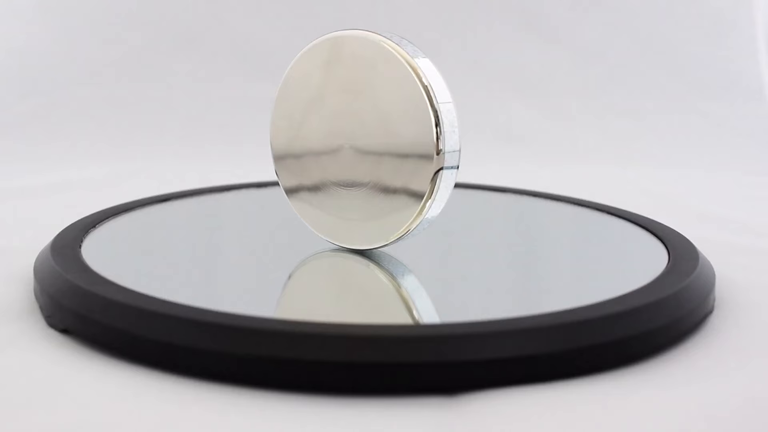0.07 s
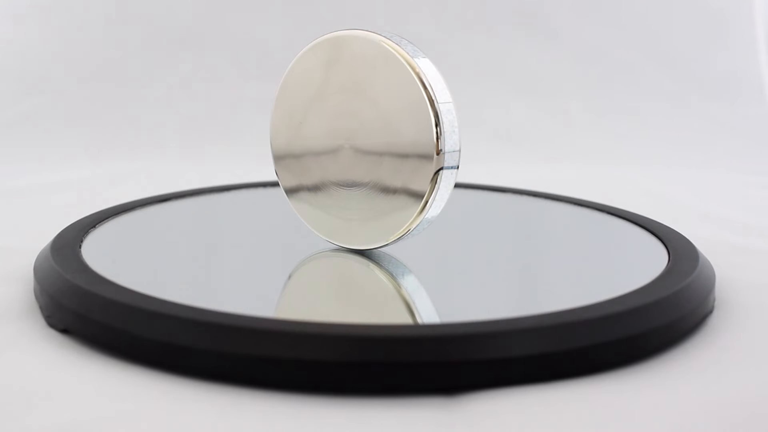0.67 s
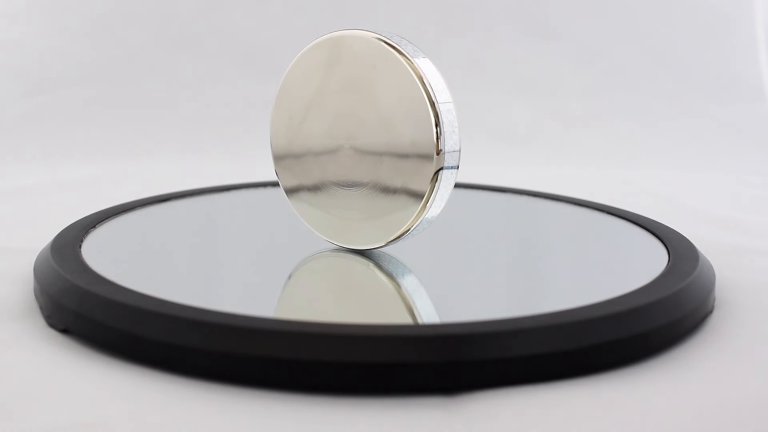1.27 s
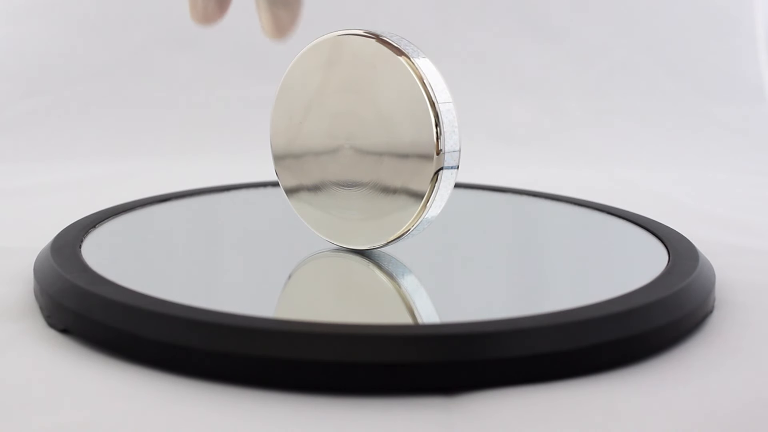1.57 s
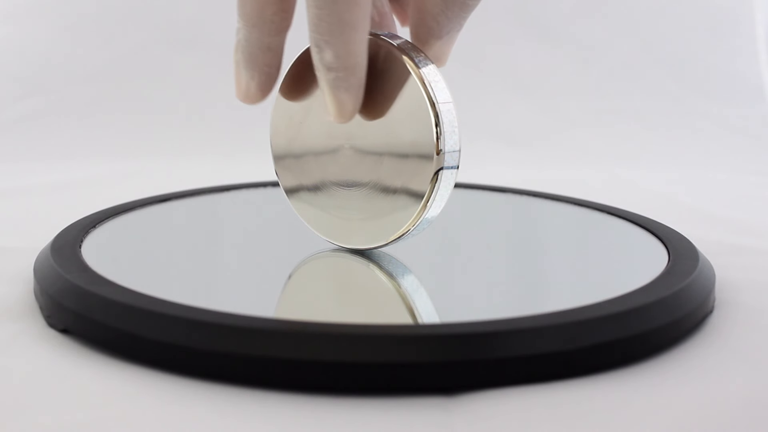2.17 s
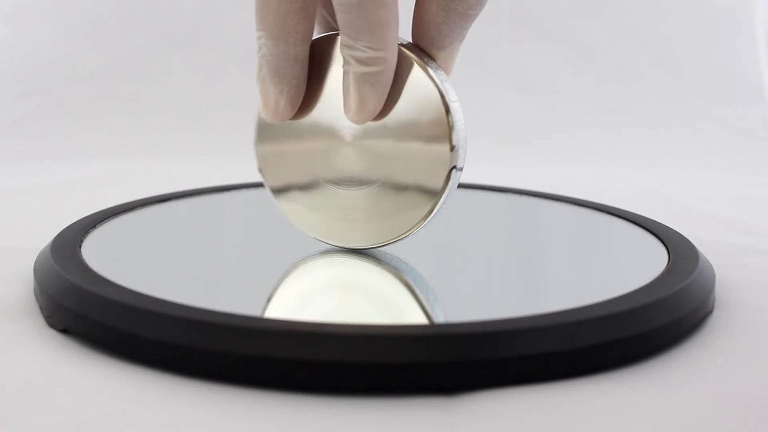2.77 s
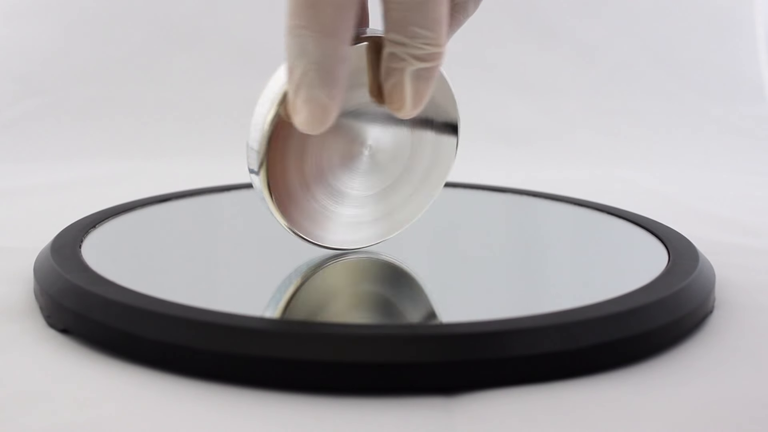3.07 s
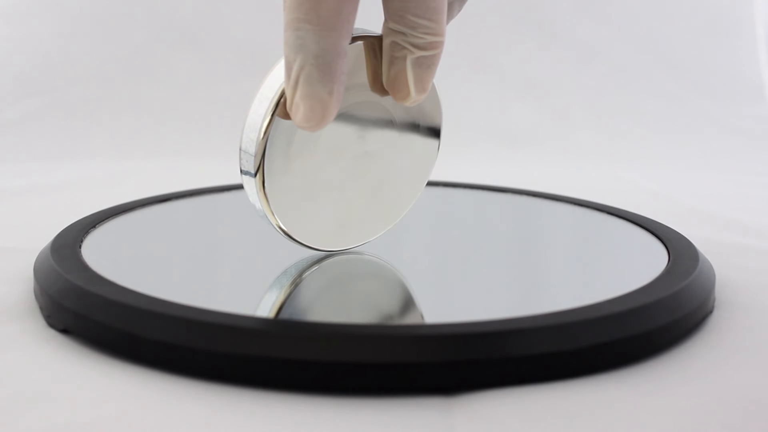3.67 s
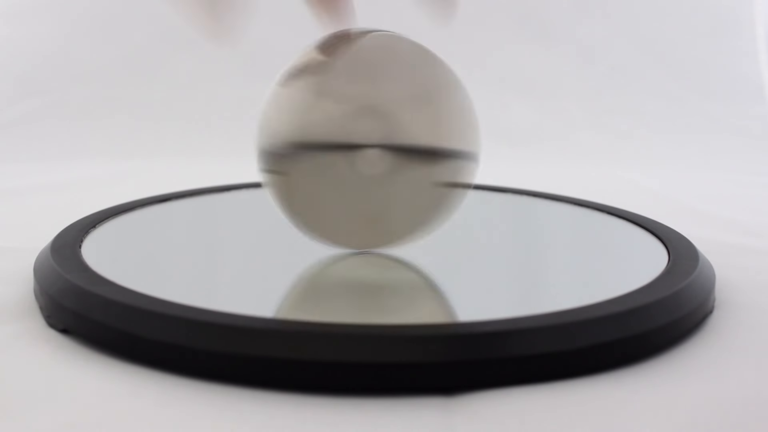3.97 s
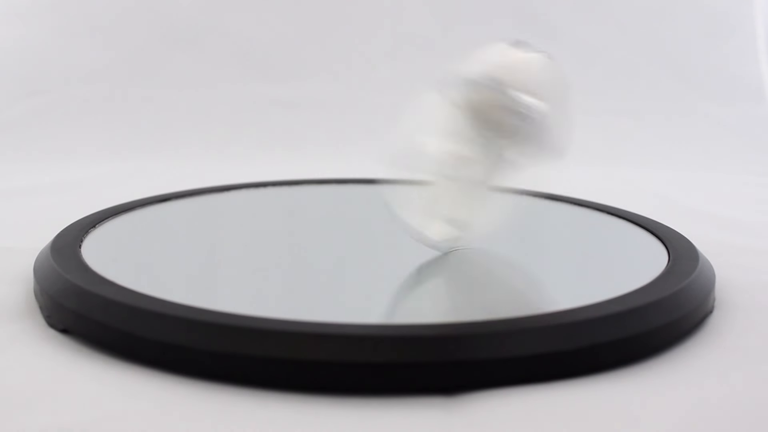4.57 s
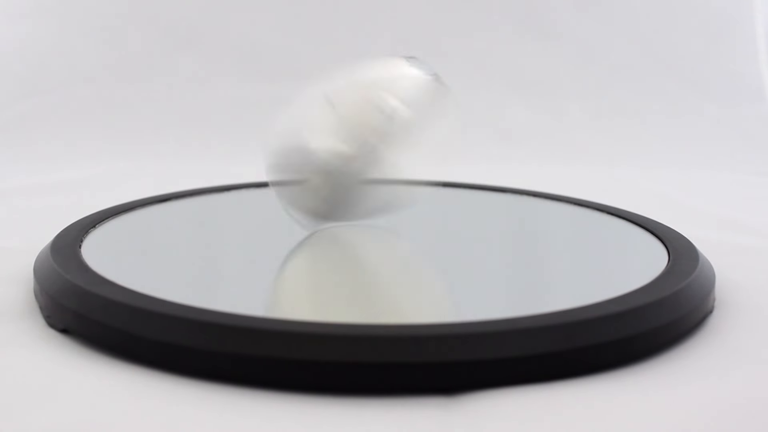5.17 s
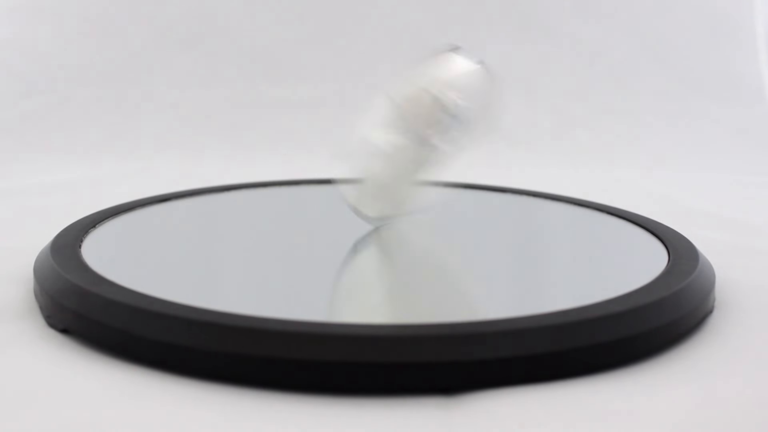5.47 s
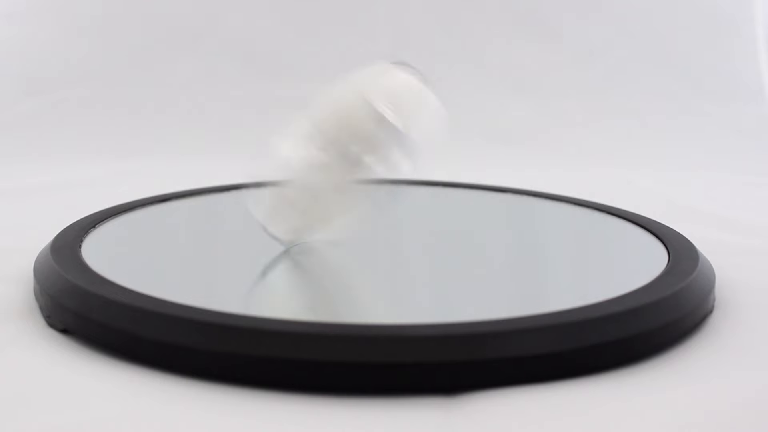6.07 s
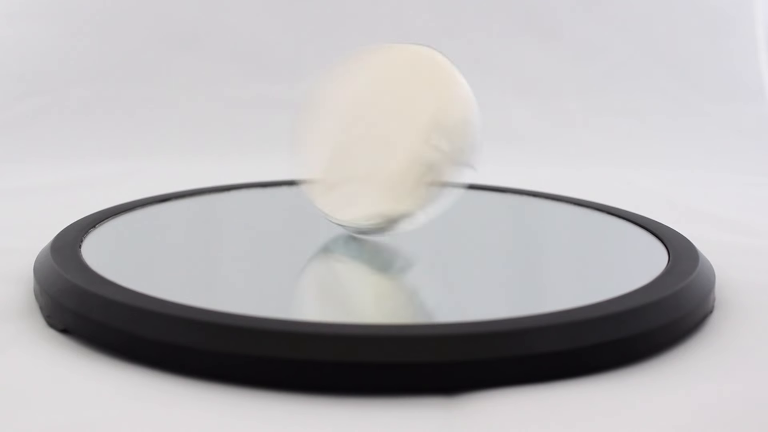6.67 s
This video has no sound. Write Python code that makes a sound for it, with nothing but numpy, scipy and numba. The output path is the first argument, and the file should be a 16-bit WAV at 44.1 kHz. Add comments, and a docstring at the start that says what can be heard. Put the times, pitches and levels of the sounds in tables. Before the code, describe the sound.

For the first four seconds there is only the soft air, hiss and faint electrical hum of a small, quiet room. The hiss is slightly stronger at first and settles. A tiny tick and two brief, faint rustles come around 1 second, and a barely audible tap at 3 seconds.

At about 4 seconds a heavy steel disk lands on a glass mirror with a loud, chattering clack that briefly overloads the microphone. A low thump and a few smaller bounces follow. By 4.4 seconds the disk is spinning on its rim, making a grainy rolling hum with a glassy ring, pulsing nearly six times a second and slowly growing louder. Light scrapes, soft knocks and dull thuds from the base dot the roll between 4.4 and 5.6 seconds. Stronger knocks come near 6, 6.3 and 6.7 seconds, the last two with sharp ticks. The spin continues to the end.

```python
"""Steel disk spinning on a glass mirror

A heavy disk is twisted and let go onto a round mirror in a small quiet room. It lands with a
bouncing clack that overloads the microphone, then spins on its rim. Microscopic bumps make a
rolling noise that swells every half turn and rings the mirror and, faintly, the disk. Flaws in the
rim give knocks and ticks, and the base thuds. Air, hiss and mains hum lie underneath; the hiss is
slightly louder at first and settles, then two brief faint rustles precede the landing."""
import sys
import numpy as np
from scipy import signal
from scipy.fft import rfft, irfft, next_fast_len
from scipy.io import wavfile
from numba import njit

SR = 44100
rng = np.random.default_rng(int(sys.argv[2]) if len(sys.argv) > 2 else 0)


def to_wav(s):
    """Save 16-bit WAV."""
    ch = np.atleast_2d(s).T  # columns
    pcm = np.round(np.clip(ch, -1, 1) * 32767)  # PCM
    wavfile.write(sys.argv[1], SR, pcm.astype(np.int16))


N = 301203
TIME = np.arange(N) / SR

# Ringing modes of the glass mirror, plus two high rings of the steel disk (6270 and 11000 Hz).
# Each row: frequency in Hz, width in Hz, gain in dB at the rim, gain in dB at landing.
RINGING_MODES = [(180, 16, -25, -12), (300.9, 5.2, 6.5, 17), (324, 16, 1, -9.5), (365, 24, 1, 3),
                 (429, 43, -7, -10), (664.5, 33, 7.5, 6), (773, 66, -4.5, -1.5), (884.6, 53, -2.5, 10),
                 (921, 20, -0.5, -13), (995, 42, 1.5, -3), (1185, 13, -7, -3), (1321, 38, 0, 0.5),
                 (1568, 86, 1, 9.5), (1705, 39, 2.5, -2), (2080, 150, -17, -40), (2217, 150, -9.5, -34),
                 (2431, 95, 3, -14), (2512, 91, 1, 6.5), (3188, 183, -7, -1.5), (3400, 56, -2.5, 4),
                 (4424, 380, -9, -9.5), (4576, 150, -6.5, -3), (5610, 130, -19.5, -39),
                 (6270, 300, -22.5, -9), (7160, 110, -26, -10.5), (7654, 270, -17, -14),
                 (9610, 490, -27.5, -20), (11000, 20, -42, -9)]
# Spectrum of the weak, quickly damped modes in between. Each row: frequency in Hz, gain in dB.
WEAK_MODES = [(30, -15), (200, 3), (350, -30.5), (560, -12.5), (750, -11.5), (1600, -3.5), (1950, -12.5),
              (2850, -13.5), (3400, -12.5), (3900, -26.5), (6000, -20.5), (8000, -33), (11000, -37),
              (16000, -58)]
# Antiresonances, where the mirror radiates little. Each row: frequency in Hz, width in Hz.
ANTIRESONANCES = [(545, 65), (1980, 100), (2790, 250)]
# Landing and bounces. Each row: start in seconds, force in dB, contact bandwidth in Hz.
BOUNCES = [(4.0245, 1.5, 1210), (4.0392, 40, 4860), (4.0445, 38.5, 4260), (4.0551, 38, 9150),
           (4.0592, 32, 9300), (4.0665, 32.5, 8100), (4.0705, 29, 6060), (4.1225, 21, 5970),
           (4.1545, 16.5, 5950), (4.2430, 9, 630)]
# The rim settling into its roll. Each row: time in seconds, force in dB relative to full rolling.
RIM_GRIP = [(4.04, -120), (4.07, -7), (4.3, -1.5), (4.38, -0.5)]
# Harder bites of the rim. Each row: centre in seconds, boost of the fine bumps in dB.
RIM_SCRAPES = [(4.42, 3), (4.955, 3.5), (5.11, 5), (5.45, 6)]
# Rim flaws striking. Each row: start in seconds, force in dB, contact bandwidth in Hz, low cut in Hz.
RIM_KNOCKS = [(4.767, 18.5, 800, 150), (4.793, 15, 1270, 150), (4.953, 16.5, 686, 150),
              (5.575, 14, 885, 199), (5.955, 23.5, 1100, 365), (6.3139, 24.5, 3020, 375),
              (6.3183, -4, 2460, 380), (6.6595, 24, 3630, 400)]
# Dry ticks. Each row: start in seconds, level in dB, centre in Hz, width in Hz, T60 in seconds.
DRY_TICKS = [(0.980, -21.5, 2240, 600, 0.0079), (0.980, -29.5, 4200, 1000, 0.0065),
             (3.971, -31.5, 13200, 5240, 0.032), (3.971, -41, 7360, 2960, 0.074),
             (4.032, -15, 14000, 7100, .004), (4.034, -24, 3000, 2000, 0.019),
             (3.014, -41.5, 1800, 2500, 0.032), (4.124, -8, 1980, 3000, 0.0068),
             (5.222, -26.5, 1520, 2000, 0.066), (6.315, -23, 7660, 2000, 0.009),
             (6.6592, -21, 7100, 2000, 0.013)]
# Dull thuds of the base. Each row: start in seconds, level in dB.
BASE_THUDS = [(3.014, -39), (4.123, -14), (4.156, -22), (4.243, -18), (4.77, -33), (4.875, -29.5),
              (5.153, -20.5), (5.2181, -23.5)]
# Background hiss, slightly louder at first and settling (two long rows), then two brief faint rustles.
# Each row: start in seconds, length in seconds, level in dB, centre in Hz, width in Hz.
HISS_SWELLS = [(0.076, 0.43, -55.5, 1700, 2600), (0.402, 1, -60, 2770, 3000),
               (0.92, 0.069, -52, 3170, 1200), (1.126, .08, -52, 12500, 5000)]
# Reverberation bands. Each row: frequency in Hz, T60 in seconds, gain in dB.
ROOM_BANDS = [(100, 0.59, -5.5), (310, 0.46, -7.5), (900, 0.66, -9), (2470, 0.74, -18), (6140, 0.49, -14),
              (14000, 0.18, -6.5)]
# Room air and microphone hiss. Each row: frequency in Hz, relative spectral density in dB.
AIR_SPECTRUM = [(25, -7), (38, -25), (55, 3.5), (85, -5), (125, -2.5), (160, -5.5), (350, -2), (520, -5.5),
                (1000, -10), (3000, -14), (8000, -20.5), (12000, -21.5), (16000, -21.5)]
# Mains hum. Each row: frequency in Hz, rms level in dB.
MAINS_HUM = [(60, -66), (120, -62.5)]


def spin(half_turns_per_s=5.72, first_crest_s=4.41, roll_db=-21, lean_db_per_s=1.34):
    """Half turns done and crest force in dB. The axis circles, shifting the crests; the lean grows."""
    wobble_hz, wobble_peak_s, wobble_half_turns, wobble_db = 1.8, 4.477, 0.046, 0.03
    wobble = 2 * np.pi * wobble_hz * (TIME - wobble_peak_s)
    age_s = TIME - first_crest_s
    half_turns = half_turns_per_s * age_s + wobble_half_turns * np.sin(wobble)
    grip_db = np.interp(TIME, *np.transpose(RIM_GRIP))
    crest_db = roll_db + lean_db_per_s * age_s + wobble_db * np.cos(wobble) + grip_db
    return half_turns, crest_db


def rolling(half_turns, crest_db, trough_db=4.5, grain_db=3.5, flutter_db=1.5):
    """Force of microscopic bumps under the rim, which presses hardest once every half turn."""
    bite_peak_db, bite_swing_db, lead_half_turns, scrape_half_s = 4, 11, 0.037, 0.05
    load = amp(crest_db - trough_db * np.sin(np.pi * half_turns) ** 2 + flutter_db * walk(70))
    bumps = unit(rng.standard_normal(N) * amp(grain_db * rng.standard_normal(N)))
    coarse, fine = split(bumps, hz=2300)
    # Fine bumps peak as the rim bites, just before each crest.
    bite_db = bite_peak_db - bite_swing_db * np.sin(np.pi * (half_turns + lead_half_turns)) ** 2
    scrape_db = sum(db * np.exp(-((TIME - s) / scrape_half_s) ** 2) for s, db in RIM_SCRAPES)
    force = load * (coarse + fine * amp(bite_db + scrape_db))
    return cut(force, hz=270, kind="high", order=4)


def face_echo(force, half_turns, near_s=0.00074, far_s=0.00102, drift=0.12, reflection=0.7):
    """Short waves bounce between glass and turning face; the changing path sweeps a comb filter."""
    lag_s = near_s + (far_s - near_s) * np.cos(np.pi * half_turns) ** 2
    lag_s *= 1 + drift * walk(4)
    _, short_waves = split(force, hz=2500)
    return force + sum(reflection ** k * np.interp(TIME - k * lag_s, TIME, short_waves) for k in (1, 2))


def blow(db, contact_hz):
    """Force of one blow; a softer contact lasts longer and holds less treble."""
    return amp(db) * cut(signal.unit_impulse(2048), contact_hz, "low")


def landing():
    """Force of the disk dropping and chattering on the glass."""
    force = np.zeros(N)
    for start_s, db, contact_hz in BOUNCES:
        add(force, start_s, blow(db, contact_hz))
    return force


def knocks():
    """Force of the rim's flaws striking the glass."""
    force = np.zeros(N)
    for start_s, db, contact_hz, low_cut_hz in RIM_KNOCKS:
        add(force, start_s, cut(blow(db, contact_hz), low_cut_hz, "high", order=3))
    return cut(force, hz=200, kind="high", order=3)


def mirror_and_disk(drop, knock, roll, wander=0.79, drop_crash_db=1, roll_crash_db=2):
    """Modes weighted by where each force acts, plus a short crash of weak modes, then notched."""
    ring = np.zeros(N)
    for k, (hz, width_hz, rim_db, landing_db) in enumerate(RINGING_MODES):
        # The rolling contact wanders across nodes; shorter waves have more of them.
        coupling = (1 + wander * walk(5 + np.sqrt(hz) / 4)) / np.hypot(1, wander)
        drive = amp(landing_db) * drop + amp(rim_db) * (knock + coupling * roll)
        ring += (-1) ** k * resonate(drive, hz, width_hz)
    decay = fade(t60_s=0.03, size=4096)
    crash = colour(rng.standard_normal(len(decay)), WEAK_MODES) * decay / np.linalg.norm(decay)
    crash_drive = amp(drop_crash_db) * drop + knock + amp(roll_crash_db) * roll
    ring += signal.oaconvolve(crash_drive, crash)[:N]
    for hz, width_hz in ANTIRESONANCES:
        ring -= resonate(ring, hz, width_hz)
    return ring


def table_thump(force, gain_db=-4, bottom_hz=35, top_hz=115):
    """The base passes a heavy blow to the table, which rumbles briefly."""
    decay = fade(t60_s=0.2, size=16384)
    response = rng.standard_normal(len(decay)) * decay / np.linalg.norm(decay)
    rumble = cut(signal.oaconvolve(force, response)[:N], top_hz, "low")
    return amp(gain_db) * cut(rumble, bottom_hz, "high", order=1)


def thuds(hz=310, attack_s=0.0015):
    """Soft blows ring only the base's lowest mode."""
    out = np.zeros(N)
    decay = fade(t60_s=0.23, size=22050)
    t = TIME[:len(decay)]
    ring = np.sin(2 * np.pi * hz * t) * decay * (1 - np.exp(-t / attack_s))
    for start_s, db in BASE_THUDS:
        add(out, start_s, amp(db) * ring)
    return out


def ticks():
    """Small dry ticks, mostly the steel rim catching on the glass."""
    out = np.zeros(N)
    for start_s, db, hz, width_hz, t60_s in DRY_TICKS:
        decay = fade(t60_s, size=4096)
        add(out, start_s, amp(db) * band_noise(len(decay), hz, width_hz) * decay)
    return out


def hiss_swells():
    """Extra background hiss that settles early on, then two brief faint rustles."""
    out = np.zeros(N)
    for start_s, length_s, db, hz, width_hz in HISS_SWELLS:
        hiss = band_noise(2 * SR, hz, width_hz)
        swell = np.hanning(int(length_s * SR))
        add(out, start_s, amp(db) * hiss[:len(swell)] * swell)
    return out


def room(direct, gap_s=0.00242):
    """Direct sound plus a small room's diffuse tail; each band decays at its own rate."""
    hz, t60_s, db = np.transpose(ROOM_BANDS)
    size = SR * 3 // 4
    spectrum = rfft(rng.standard_normal(size))
    response = np.zeros(size)
    for k, weights in enumerate(np.eye(len(hz))):
        band = irfft(spectrum * np.interp(log_bins(size), np.log(hz), weights), size)
        decay = fade(t60_s[k], size) * (TIME[:size] > gap_s)
        response += amp(db[k]) * band * decay / np.linalg.norm(decay)
    return direct + signal.fftconvolve(direct, response)[:N]


def background(air_db=-48, start_s=0.08):
    """Steady air, hiss and faint mains hum."""
    hum = sum(amp(db) * np.sqrt(2) * np.sin(2 * np.pi * (hz * TIME + rng.random()))
              for hz, db in MAINS_HUM)
    air = amp(air_db) * unit(colour(rng.standard_normal(N), AIR_SPECTRUM))
    return (air + hum) * (TIME > start_s)


def amp(db):
    """Decibels to gain."""
    return 10 ** (np.asarray(db) / 20)


def unit(x):
    """Scale to rms 1."""
    return x / np.std(x)


def log_bins(size):
    """Log frequency of each FFT bin."""
    return np.log(np.maximum(np.arange(size // 2 + 1) * SR / size, 1))


def colour(x, points):
    """Shape a spectrum by (Hz, dB) points."""
    hz, db = np.transpose(points)
    size = next_fast_len(len(x), True)
    gain = amp(np.interp(log_bins(size), np.log(hz), db))
    return irfft(rfft(x, size) * gain, size)[:len(x)]


def resonate(x, hz, width_hz):
    """Two-pole resonance, gain 1 at centre."""
    return signal.lfilter(*signal.iirpeak(hz, hz / width_hz, fs=SR), x + 1e-18)


def band_noise(size, hz, width_hz):
    """Noise through the same resonance twice, rms 1."""
    once = resonate(rng.standard_normal(size), hz, width_hz)
    return unit(resonate(once, hz, width_hz))


def cut(x, hz, kind, order=2):
    """Low-pass or high-pass."""
    return signal.sosfilt(signal.butter(order, hz, kind, fs=SR, output="sos"), x + 1e-18)


def split(x, hz):
    """Zero-phase low and high bands."""
    low = signal.sosfiltfilt(signal.butter(2, hz, fs=SR, output="sos"), x)
    return low, x - low


def walk(rate_hz):
    """Random levels joined by straight lines; spread near 1."""
    levels = rng.standard_normal(1024)
    return np.interp(TIME * rate_hz, np.arange(len(levels)), levels) * np.sqrt(3 / 2)


def fade(t60_s, size):
    """Exponential decay, 60 dB in t60_s."""
    return np.exp(-np.log(1000) * TIME[:size] / t60_s)


def add(track, start_s, sound):
    """Mix a short sound into a track."""
    i = int(start_s * SR)
    track[i:i + len(sound)] += sound[:N - i]


@njit
def follow(x, attack_s, release_s):
    """Envelope with separate rise and fall times."""
    envelope, level = np.empty(len(x)), 0.
    for i in range(len(x)):
        lag_s = attack_s if abs(x[i]) > level else release_s
        level += (abs(x[i]) - level) / (lag_s * SR)
        envelope[i] = level
    return envelope


def scene():
    """Disk and mirror in the room, mono."""
    half_turns, crest_db = spin()
    drop = landing()
    roll = face_echo(rolling(half_turns, crest_db), half_turns)
    direct = mirror_and_disk(drop, knocks(), roll) + table_thump(drop) + ticks() + hiss_swells()
    return (room(direct) + thuds() + background())[None]


def record(dry, knee_db=-17, ratio=1.8, top_hz=16100):
    """Gain control ducks after the landing, whose first peaks clip; a steep low-pass follows."""
    envelope = follow(dry[0], attack_s=0.0047, release_s=0.15)
    gain = np.maximum(envelope / amp(knee_db), 1) ** (1 / ratio - 1)
    clipped = np.clip(dry * gain, -1, 1)
    return signal.sosfilt(signal.ellip(8, 0.2, 70, top_hz, fs=SR, output="sos"), clipped)


dry = scene()
out = record(dry)
to_wav(out)
```